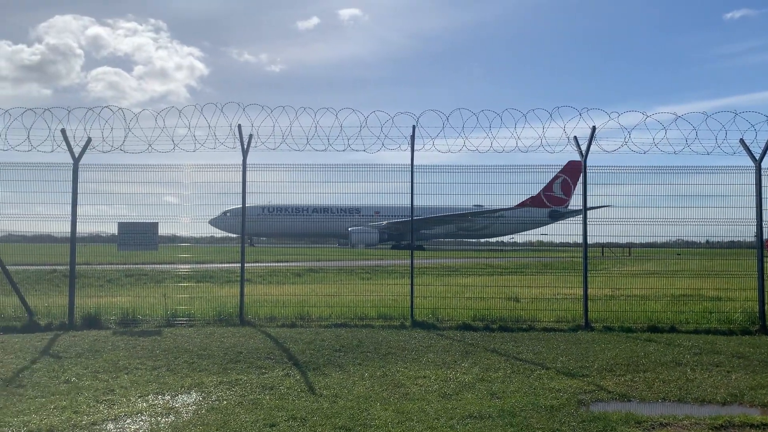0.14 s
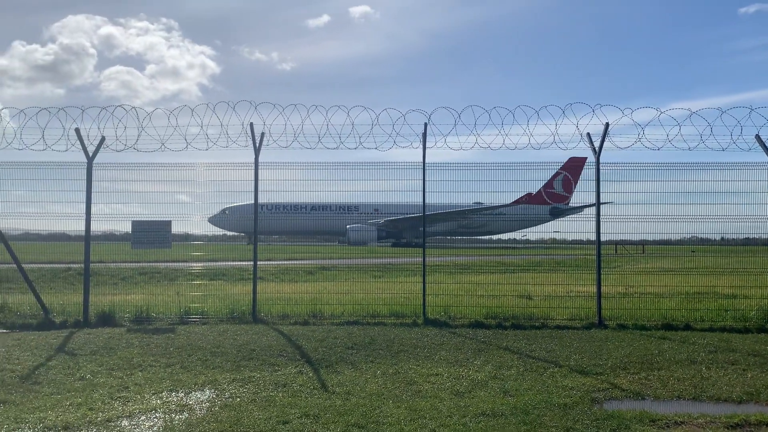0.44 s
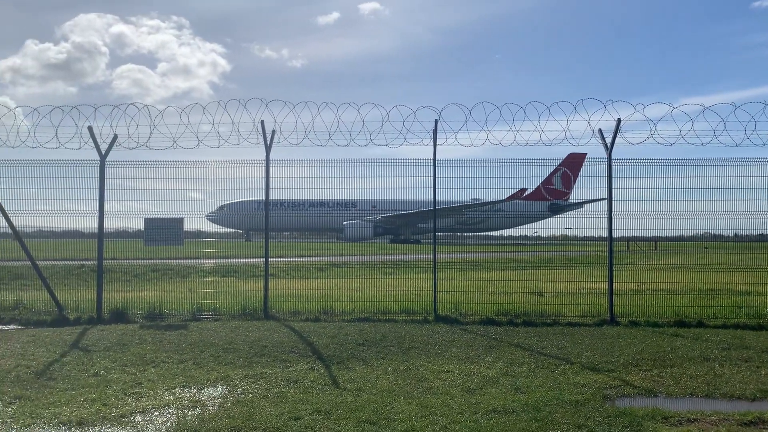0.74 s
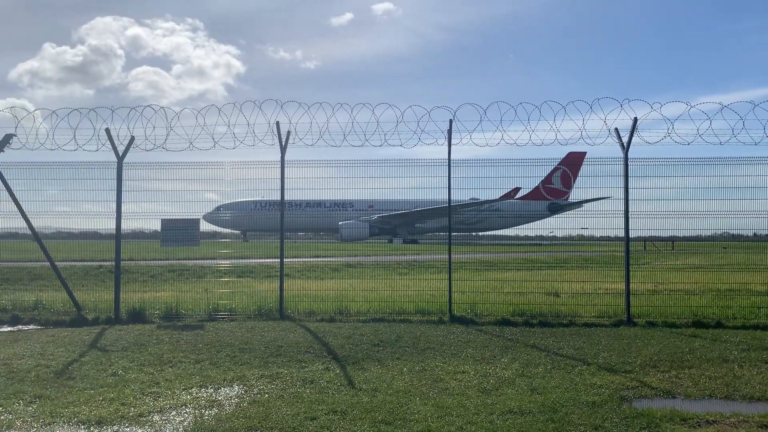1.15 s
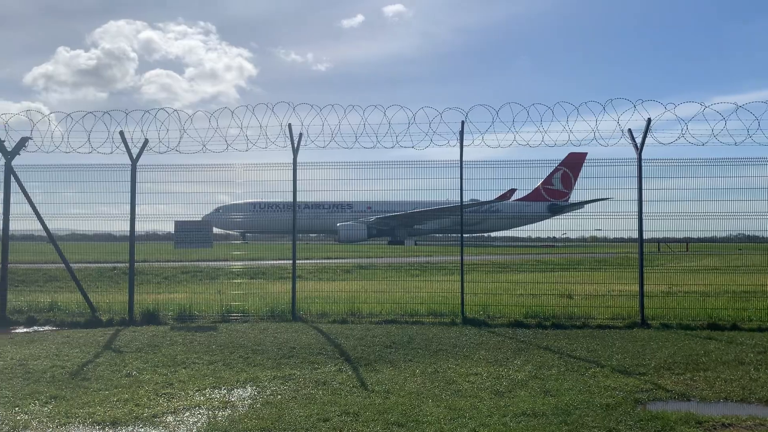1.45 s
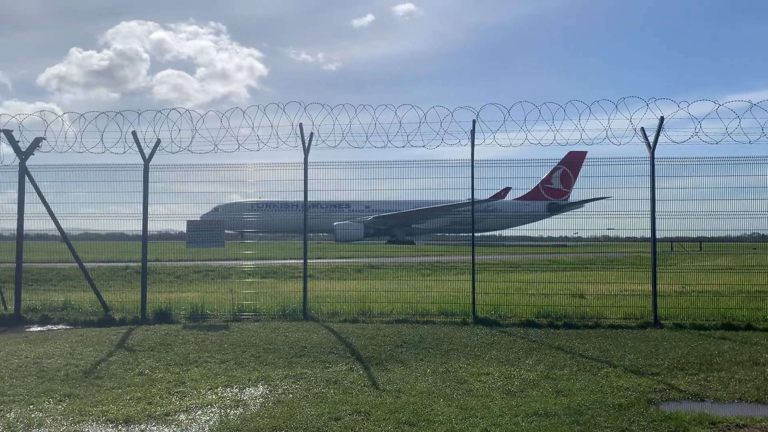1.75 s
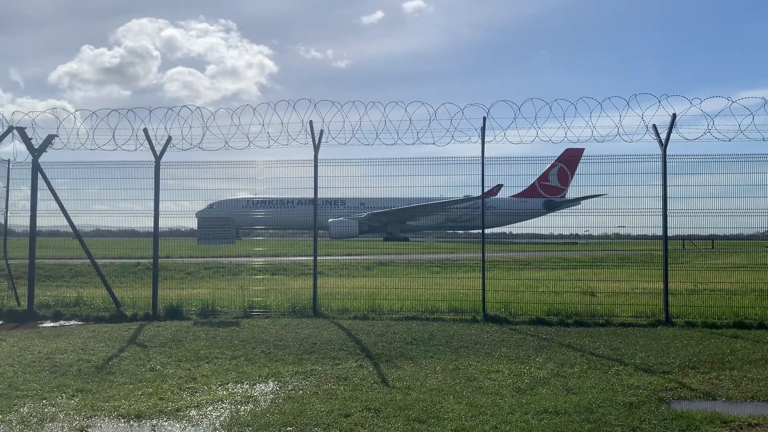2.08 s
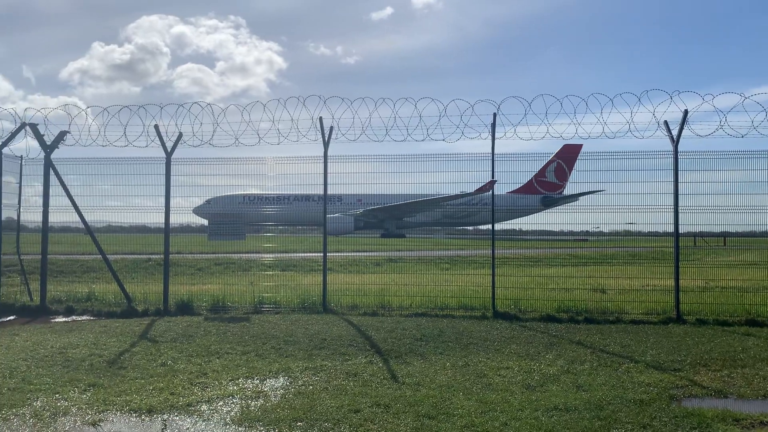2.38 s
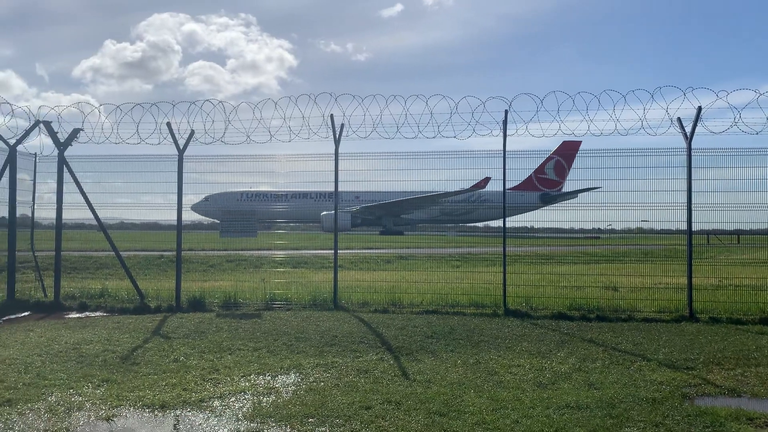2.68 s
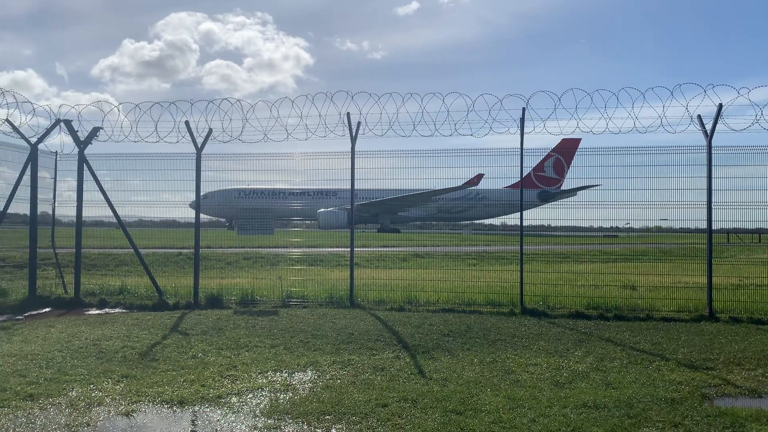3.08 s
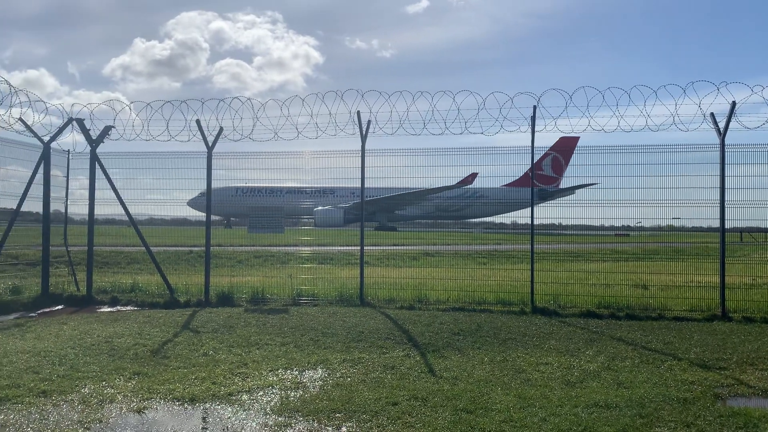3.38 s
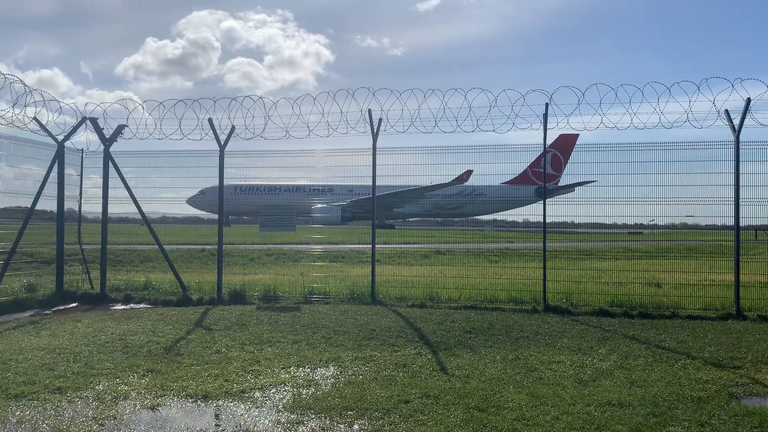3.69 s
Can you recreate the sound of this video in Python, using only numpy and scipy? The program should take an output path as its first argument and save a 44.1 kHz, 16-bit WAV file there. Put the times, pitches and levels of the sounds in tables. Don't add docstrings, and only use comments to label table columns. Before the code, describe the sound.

A large jet airliner taxis across an open airfield, roaring continuously for about 3.8 seconds. Deep rumble and a wavering low drone build slightly; the brighter fan roar eases after 1 s as turbine hiss grows. Thin high whines flicker, some fluttering rapidly. Wind moans softly and buffets the stereo phone, with stronger pops near 1.85 and 2.1 s and gusts around 2.6, 2.85 and 3.6 s. Hiss swells near 0.7 and 3.7 s.

```python
import sys
import numpy as np
from scipy import signal
from scipy.io import wavfile
from scipy.ndimage import uniform_filter1d

SR = 44100
rng = np.random.default_rng(int(sys.argv[2]) if len(sys.argv) > 2 else 0)


def undo_db(level):
    steps = np.asarray(level, float) / 20
    return 10 ** steps


def master(y):
    cut = np.clip(np.atleast_2d(y).T, -1, 1)
    pcm = np.round(cut * 32767)
    wavfile.write(sys.argv[1], SR, pcm.astype(np.int16))


N = 168903

# frequency in Hz, level in dB per Hz.
MOAN_SPECTRUM = [(170, -31.5), (230, -18), (290, 2.5), (315, -7), (335, -14), (420, -20)]
# frequency in Hz, level in dB per Hz.
BUFFET_SPECTRUM = [(230, -26), (310, -4), (390, 1), (480, -5), (700, -11.5), (1000, -24.5), (1400, -28)]
# time in seconds, level in dB.
GUST_DB = [(0, -0.5), (.25, -4), (.5, 0.5), (.62, -9.5), (.8, 1), (.95, -8), (1.7, -2.5), (1.85, -3),
           (2.2, -4), (2.45, -6), (2.61, 6), (2.7, -2.5), (2.84, 8.5), (3.0, -6.5), (3.13, 5), (3.35, 0.5),
           (3.63, 11.5), (3.8, -3.5)]
# start in seconds, peak level in dB.
POPS = [(0.357, -31), (0.45, -23), (0.531, -27.5), (0.756, -25.5), (0.865, -33.5), (1.12, -31.5),
        (1.85, -12.5), (2.062, -16.5), (2.531, -27), (2.61, -26), (2.761, -24.5), (2.824, -28),
        (2.932, -51.5), (3.115, -23.5), (3.254, -18), (3.541, -26), (3.596, -26), (3.664, -22)]
# frequency in Hz, level in dB per Hz.
RUMBLE_SPECTRUM = [(13, -30.5), (22, -52), (47, -3), (97, -0.5), (124, -4.5), (156, -2), (269, -12),
                   (306, -8.5), (480, -37.5), (620, -66.5), (1060, -120)]
# frequency in Hz, level in dB per Hz.
CORE_SPECTRUM = [(3000, -15.5), (3350, -1), (3950, 0), (4500, -1), (5200, -2), (6000, 1), (6800, -6.5),
                 (7300, -5.5)]
# frequency in Hz, turn in radians.
CORE_TURN_RAD = [(3300, -1.5), (3650, -2.2), (3900, -.3), (4400, -.6), (4900, 2.4), (6000, .9), (6800, .9),
                 (7100, 1.4)]
# frequency in Hz, gain in dB.
CORE_RIGHT_DB = [(3300, 1.5), (4400, 2), (5000, 5.5), (5700, 5.5), (6000, -0.5), (7000, 8)]
# frequency in Hz, likeness from 0 to 1.
CORE_LIKENESS = [(3300, .3), (3900, .85), (4300, .5), (4700, .3), (5300, .65), (6000, .8), (7000, .7)]
# centre in seconds, half length in seconds, rise in dB.
AIR_SURGES = [
    (.705, .06, 5),
    (1.06, .08, 2),
    (3.71, .16, 5.5),
]
# frequency in Hz, level in dB per Hz.
TURBINE_SPECTRUM = [(6900, -14), (7400, -1), (7800, -3.5), (8110, 2), (8300, -5), (9100, -14.5),
                    (10250, -23.5), (11600, -34)]
# frequency in Hz, turn in radians.
TURBINE_TURN_RAD = [(7400, 1.4), (8100, 2.5), (8350, 3.14), (9000, 3.14), (9500, 3.8), (10200, 5.7),
                    (10500, 6.28)]
# frequency in Hz, likeness from 0 to 1.
TURBINE_LIKENESS = [(7400, .8), (8000, .93), (8350, .997), (8900, .997), (9300, .7), (10200, .7),
                    (10600, .98)]
# time in seconds, level in dB.
WHINE_DB = [(0, -51), (.08, -45), (.2, -54), (.7, -51), (.78, -57.5), (.96, -63), (1.0, -52), (1.48, -52),
            (1.6, -63), (1.88, -60), (1.94, -56), (2.0, -64), (2.12, -46), (2.19, -60), (2.3, -51),
            (2.85, -59), (3.3, -65), (3.75, -57.5)]
# time in seconds, level in dB.
PAIR_DB = [(0, -62), (.8, -57.5), (1.8, -62.5), (2.0, -56), (2.5, -56), (2.65, -58.5), (2.9, -54),
           (3.3, -58), (3.45, -63.5), (3.76, -54), (3.83, -61)]
# time in seconds, fan level in dB, turbine level in dB.
ANGLE_DB = [(0, 2.5, -4), (.5, 3, -3.5), (1.04, 2, 0.5), (1.46, 0, -3), (1.7, -1, -2.5), (2.1, 1, 0.5),
            (2.9, -0.5, 1), (3.83, -1, 2)]
# frequency in Hz, level in dB per Hz.
FAN_SPECTRUM = [(280, -37), (480, -19), (552, -9.5), (831, -2.5), (1360, -4), (2010, 1), (2350, -3.5),
                (2820, -3), (3400, -21), (4420, -45), (7480, -120)]
BLADE_HZ = [1529, 1824, 2238, 3227, 3598, 4964, 6277]
# level in dB, width in Hz, share of the fan fade.
BLADES = [(-54.5, 6, .3), (-51.5, 8, 1.5), (-54, 20, 2.6), (-66, 6, .1), (-64, 8, .1), (-70, 14, .1),
          (-72, 8, .1)]
BLADE_TURN_RAD = [-.2, -.3, -.7, -1.2, 2.6, 2, .6]


def evened(x):
    return x / np.sqrt(np.mean(x ** 2) + 1e-20)


def read(points, hz):
    f, value = np.transpose(points)
    return np.interp(np.log(hz + 1), np.log(f + 1), value)


def along(points, t, column=1):
    columns = np.transpose(points)
    return np.interp(t, columns[0], columns[column])


def wander(fastest_hz, t, slowest_hz=0.27):
    rates_hz = np.geomspace(slowest_hz, fastest_hz, 24)
    return evened(sum(np.sin(2 * np.pi * (f * t + rng.random())) / np.sqrt(f) for f in rates_hz))


def noise(shape, likeness, turn_rad, right_db, patchy_db, size=1024):
    frames = 4 * N // size + 5
    hz = np.fft.rfftfreq(size, 1 / SR)
    a, b, c, d, patches = rng.standard_normal((frames, len(hz), 5)).T
    patches = uniform_filter1d(patches, size=9, axis=0)
    patches = evened(uniform_filter1d(patches, size=12, axis=1))

    same = read(likeness, hz)[:, None] if np.ndim(likeness) else likeness
    same = np.clip(same, 0, 1)
    left = a + 1j * b
    right = same * left + np.sqrt(1 - same ** 2) * (c + 1j * d)
    right = right * (undo_db(right_db(hz)) * np.exp(1j * turn_rad(hz)))[:, None]

    inside = (hz >= shape[0][0]) & (hz <= shape[-1][0])
    gain = undo_db(read(shape, hz)[:, None] + patchy_db * patches) * inside[:, None]
    z = np.array([left, right]) * gain
    return evened(signal.istft(z, nperseg=size, noverlap=size * 3 // 4)[1][:, :N])


def tone(hz, db, turn_rad, drift_hz=0.):
    drift = drift_hz * evened(uniform_filter1d(rng.standard_normal(N), size=2000))
    phase = 2 * np.pi * np.cumsum(hz + drift) / SR
    return np.sqrt(2) * undo_db(db) * np.sin([phase, phase + turn_rad])


def pop(t, start_s, db):
    cycles = 3.6
    burst_hz = 467 + 14 * (db + 28)
    u = np.clip((t - start_s) * burst_hz / cycles, 0, 1)
    swell = np.sin(np.pi * u ** 0.92) ** 2
    return swell * np.sin(2 * np.pi * cycles * u * (1.3 - 0.6 * u))


def breeze(t):
    moan = noise(MOAN_SPECTRUM, 0.27, np.zeros_like, np.zeros_like, patchy_db=1.2)
    moan_db = -36 - 7 * np.maximum(t - 2.5, 0) + 1.8 * wander(20, t, 5.4)
    buffet = noise(BUFFET_SPECTRUM, 0.55, np.zeros_like, np.zeros_like, patchy_db=5.5, size=256)
    lumps_db = 3.2 * np.minimum(wander(60, t, 9.), 1.2)
    out = undo_db(moan_db) * moan + undo_db(-40 + along(GUST_DB, t) + lumps_db) * buffet

    right_lag_s, right_db = 0.0003, -4
    for start_s, db in POPS:
        for port in range(2):
            out[port] += undo_db(db + 4 + port * right_db) * pop(t, start_s + port * right_lag_s, db)
    return out


def exhaust(t):
    rumble = noise(RUMBLE_SPECTRUM, 0.99, np.zeros_like, np.zeros_like, patchy_db=1.22, size=4096)
    rumble_db = -20 + 0.55 * (t - 2) + 0.16 * along(GUST_DB, t)
    drone = tone(101.5, -25.5 + 1.5 * wander(6, t), 0, 0.44)
    return undo_db(rumble_db) * rumble + drone


def core(t):
    surge_db = sum(db * np.exp(-((t - s) / half_s) ** 4) for s, half_s, db in AIR_SURGES)
    hiss = noise(CORE_SPECTRUM, CORE_LIKENESS, lambda hz: read(CORE_TURN_RAD, hz),
                 lambda hz: read(CORE_RIGHT_DB, hz), patchy_db=1.9)
    turbine = noise(TURBINE_SPECTRUM, TURBINE_LIKENESS, lambda hz: read(TURBINE_TURN_RAD, hz),
                    np.zeros_like, patchy_db=1.7)
    hiss_db = -49 + surge_db + 0.2 * along(ANGLE_DB, t)
    turbine_db = -49.5 + along(ANGLE_DB, t, column=2)
    return undo_db(hiss_db) * hiss + undo_db(turbine_db) * turbine


def compressors(t):
    whine = tone(4061, along(WHINE_DB, t) + 1.2 * wander(25, t, 7.), -0.39, 3.1)
    beat_per_s, beat_peak_s = 9.05, 2.88
    beat = 2 * np.cos(np.pi * beat_per_s * (t - beat_peak_s))
    pair = tone(3644, along(PAIR_DB, t) - 0.5 + 1.2 * wander(19, t, 4.), -1.85, 3)
    return whine + beat * pair


def fan(t):
    lead_s, beam_hz, level_db = 56.5e-6, 1440, -36
    fade_db = along(ANGLE_DB, t)
    roar = noise(FAN_SPECTRUM, 0.87, lambda hz: -2 * np.pi * hz * lead_s,
                 lambda hz: -0.1 + 0 * hz, patchy_db=1.0)
    low = signal.sosfiltfilt(signal.butter(2, beam_hz, fs=SR, output="sos"), roar)
    beamed = roar - low

    tones = 0
    for hz, (db, width_hz, share), turn_rad in zip(BLADE_HZ, BLADES, BLADE_TURN_RAD):
        shimmer_db = 2.5 * wander(20, t, 4)
        tones = tones + tone(hz, db + share * fade_db + shimmer_db, turn_rad, width_hz / 2)
    tones = tones * undo_db([[-0.7], [0.7]])
    return undo_db(level_db + 0.84 * (t - 1)) * low + undo_db(level_db + fade_db) * beamed + tones


def scene():
    t = np.arange(N) / SR
    return breeze(t) + exhaust(t) + core(t) + compressors(t) + fan(t)


def gate(x):
    gate_hz, gate_db, sheen_hz, sheen_db_per_s = 8330, -87, 8700, 0.7
    hz, t, z = signal.stft(x, SR, nperseg=1024, noverlap=512)
    z = z * undo_db((hz >= sheen_hz)[:, None] * sheen_db_per_s * t)
    power = abs(z[:, :512]) ** 2
    bands = power.reshape(2, 64, 8, -1).mean(2).repeat(8, axis=1)
    keep = (bands > undo_db(gate_db) ** 2) | (hz[:512, None] < gate_hz)
    keep = np.pad(keep, ((0, 0), (0, 1), (0, 0)))
    return signal.istft(z * keep, SR, nperseg=1024, noverlap=512)[1][:, :N]


def roll_off(x):
    return signal.sosfilt(signal.butter(12, 11590, fs=SR, output="sos"), x)


def record(dry):
    mono_hz = 210
    high = signal.butter(4, mono_hz, "high", fs=SR, output="sos")
    side = signal.sosfilt(high, (dry[0] - dry[1]) / 2)
    mid, side = gate(np.array([dry.mean(0), side]))
    ramp = np.minimum(np.arange(N) / SR / 0.0014 + 0.84, 1)
    mix = np.array([mid + side, mid - side]) * ramp
    return roll_off(mix)


dry = scene()
out = record(dry)
master(out)
```